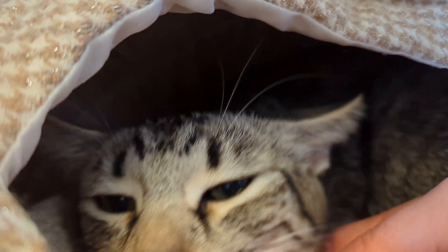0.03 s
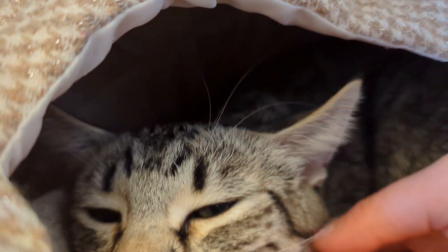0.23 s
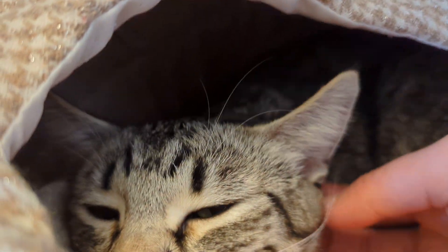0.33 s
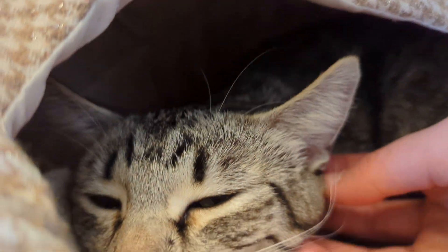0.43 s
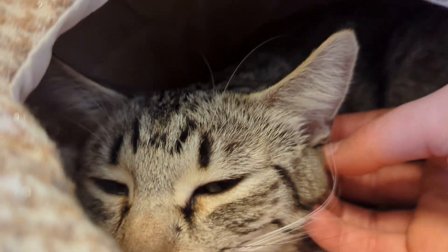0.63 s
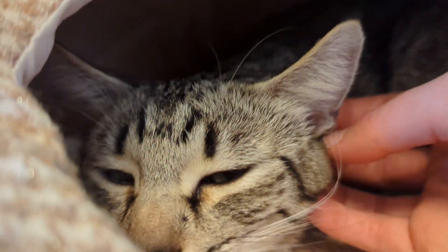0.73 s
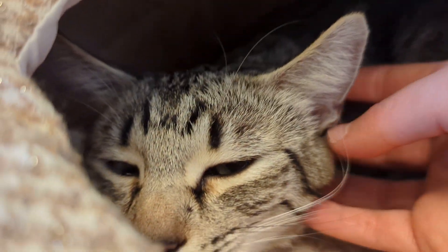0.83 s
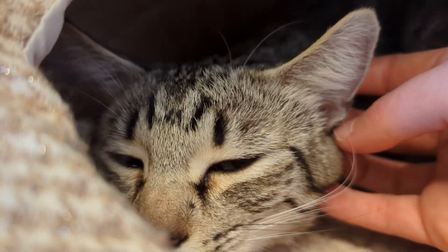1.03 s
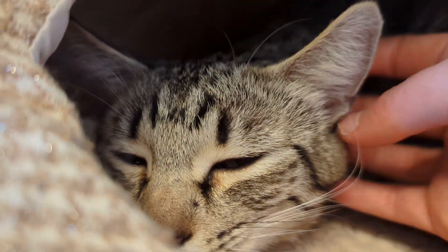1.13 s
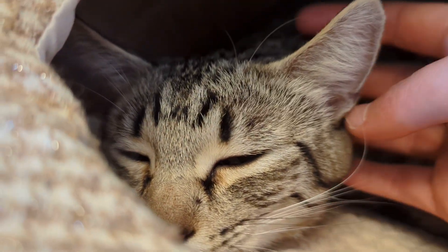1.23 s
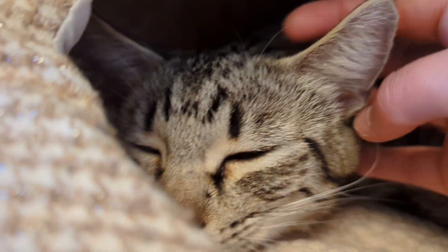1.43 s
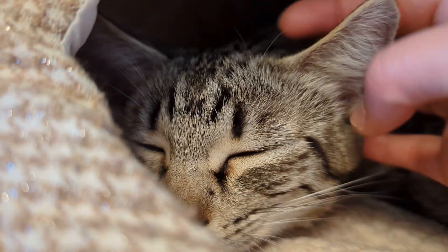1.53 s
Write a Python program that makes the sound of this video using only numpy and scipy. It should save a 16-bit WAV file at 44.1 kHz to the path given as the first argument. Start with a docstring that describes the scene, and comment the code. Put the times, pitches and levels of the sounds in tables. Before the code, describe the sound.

Fingers scratch a cat under a blanket, close to the microphone. A faint purr and brief hollow tone open over low room rumble. From 0.3 to 0.9 seconds, strokes rub fabric and swish through fur with a thin ring. Soft, deep thumps bump the microphone, strongest near 0.5. One short scuffing knock comes at about 1.05, then light blanket grazes and quicker purring until 1.6.

```python
"""A faint purr and a brief hollow tone over the low rumble of a quiet room; then, close up, fingers
scratch a cat that lies under a blanket. Each stroke drags over fabric (a dull rub with a thin ring)
and through fur (a bright swish); hand or blanket bumps the microphone with soft, deep thumps.
The purr is a train of pulses ringing throat and chest. About a second in, one short scuffing
knock sounds into the room."""
import sys
import numpy as np
from scipy import signal
from scipy.fft import rfft, irfft
from scipy.io import wavfile

SR = 44100
rng = np.random.default_rng(int(sys.argv[2]) if len(sys.argv) > 2 else 0)


def log_audio(samples):
    """Write samples as a 16-bit WAV file to the path given in sys.argv[1]."""
    # one column per channel
    frames = np.atleast_2d(samples).T
    # limit to full scale, then quantise
    limited = np.clip(frames, -1, 1)
    pcm = np.round(limited * 32767).astype(np.int16)
    wavfile.write(sys.argv[1], SR, pcm)


N = 70560
T = np.arange(N) / SR

# how alike left and right are in the noise beds: freq_hz, correlation
STEREO_LIKENESS = [(60, 1), (150, 0.94), (300, 0.68), (550, 0.058), (1600, -0.2), (5000, -0.019),
                   (15000, 0.088)]
# which way the noise beds lean: freq_hz, left_minus_right_db
STEREO_BALANCE = [(60, -1.9), (300, 1.8), (550, -0.5), (1500, -1.5), (4000, 0), (8000, -1.5), (14000, -5)]
# colour of the room rumble: freq_hz, density_db
ROOM_SPECTRUM = [(20, -37), (32, -29.5), (45, -5.5), (62, 1.5), (76, 2.5), (97, -2.5), (118, -2),
                 (140, -17), (200, -29.5), (280, -20.5), (400, -30), (490, -40), (600, -35), (800, -46.5),
                 (1800, -54), (4200, -67), (15000, -77.5)]
# the rumble's gentle swell: time_s, gain_db
ROOM_SWELL = [(0, 0.5), (.25, 1), (.7, 6.5), (.95, 0.5), (1.25, 0.5), (1.6, 0.5)]
# runs of purring, the last one quicker: start_s, end_s, pulse_rate_hz, gain_db
PURR_RUNS = [(0.018, .15, 24, -6), (.206, .45, 23.6, -1.5), (0.592, 1.05, 23.4, -3), (1.209, 1.6, 29, -3.5)]
# resonances of throat and chest: pitch_hz, level_db, t60_s
THROAT_MODES = [(97, -49, 0.065), (246.4, -52, 0.056), (276.8, -51, 0.098), (359, -57, 0.061),
                (600, -65, 0.056)]
# light grazes of the blanket: start_s, rise_s, hold_s, level_db
BLANKET_BRUSHES = [(0.196, 0.1, 0.029, -79.5), (1.31, .012, .012, -80.5), (1.422, 0.021, 0.047, -71),
                   (1.52, 0.059, .05, -75)]
# colour of a graze: freq_hz, density_db
BRUSH_SPECTRUM = [(200, -17.5), (700, 6.5), (1600, 4.5), (2600, -3), (4500, -14), (7000, -30), (16000, -25)]
# hand or blanket bumping the microphone: start_s, gain_db, tilt_db_per_octave, length_ratio
MIC_BUMPS = [(.205, -13, 1, 0.32), (0.323, -15, 2, 0.77), (.468, 0, 1.5, 1.0), (.875, -17, 1, 0.49),
             (0.946, -18.5, -4.5, 1.22), (1.556, -22, -6.5, 1.3)]
# the deep tones of a thump, swelling one after another: pitch_hz, level_db, delay_s, rise_s, t60_s
THUMP_MODES = [(40.8, -32.5, 0.044, 0.027, .3), (58.7, -22, 0.041, 0.027, .55),
               (100.46, -17.5, 0.0085, 0.024, 0.28), (184, -35.5, -.002, .022, 0.18)]
# colour of the dull crush in each bump: freq_hz, density_db
CRUSH_SPECTRUM = [(60, -27), (150, -1), (250, 1.5), (400, -7), (520, -17), (800, -26.5), (2000, -52.5),
                  (16000, -78.5)]
# finger strokes: start_s, rise_s, hold_s, rub_db, resonance_over_rub_db, swish_db
FINGER_STROKES = [(0.282, 0.034, 0.016, -55, -9.5, -86), (0.311, 0.023, 0.013, -52.5, 2.5, -72),
                  (0.388, 0.0088, 0.025, -49.5, 4.5, -61.5), (0.403, 0.048, 0.018, -62.5, -15, -55.5),
                  (0.529, .004, 0.0036, -69, -6, -54), (.541, 0.011, 0.0082, -58, -4, -51.5),
                  (.585, 0.018, 0.0051, -65.5, -17, -66), (0.653, 0.0052, 0.019, -83, -19, -53.5),
                  (0.68, 0.0087, 0.098, -65.5, -9.5, -73), (0.779, 0.047, 0.0068, -68, -9, -61),
                  (0.807, 0.026, 0.016, -56, -7.5, -78), (0.936, 0.014, 0.0047, -69.5, -16, -80)]
# dull colour of rubbed fabric: freq_hz, density_db
RUB_SPECTRUM = [(150, -2), (350, 0), (640, 6), (820, -6.5), (1130, 3.5), (1350, 0.5), (1750, -1),
                (2300, -1), (3000, -12.5), (4200, -16.5), (9000, -34), (16000, -43)]
# midrange resonances of the rub, also heard in the knock: pitch_hz, width_hz, gain_db
RUB_RESONANCES = [(1587, 26, -11.5), (1606, 36, -10), (1743, 17.2, -1), (1849, 29, -9), (1910, 16, -5.5)]
# bright colour of fur: freq_hz, density_db
FUR_SPECTRUM = [(300, 2), (900, 5.5), (2600, 3), (4000, 0.5), (5600, -0.5), (7200, 1), (8300, 4.5),
                (10000, -2), (13500, -0.5), (16000, -10)]
# the thin ring over the strokes: pitch_hz, width_hz, gain_db
THIN_RING_MODES = [(4717, 33, -4.5), (4729, 29, -3.5), (4724, 240, 3), (4930, 45, -14), (9730, 70, -15),
                   (12538, 35, -14.5)]
# fader ride of the thin ring: time_s, level_db
THIN_RING_RIDE = [(0, -115), (.28, -105), (.31, -76), (.342, -83), (.355, -58.5), (.41, -59), (.435, -52),
                  (.49, -55), (.535, -64.5), (.6, -76), (.84, -75), (.97, -102), (1.6, -115)]
# the knock's quick contacts: start_s, scuff_db, body_db
KNOCK_CONTACTS = [(1.050, -45, -27), (1.058, -37, -4), (1.0653, -64, 0.5), (1.070, -61, -2),
                  (1.0755, -50, -6.5), (1.121, -57, -11)]
# the hollow body that is knocked: pitch_hz, level_db, t60_s
BODY_MODES = [(279, -42, 0.17), (414.5, -38.5, 0.087), (554.3, -44.5, 0.13), (587, -47, 0.2),
              (643, -44, 0.075)]
# colour of the scuff at each contact: freq_hz, density_db
SCUFF_SPECTRUM = [(300, -8.5), (650, 5), (850, -23.5), (1350, -18), (1620, 2), (1850, 2), (2150, -14),
                  (2850, -7), (3400, -17.5), (5000, -19), (6000, -26.5), (9000, -33), (16000, -45)]
# colour of the room's answer to the knock: freq_hz, density_db
TAIL_SPECTRUM = [(200, -33), (400, 9.5), (600, 7), (820, -12), (1300, -8.5), (1680, -2.5), (2150, -9),
                 (2750, -11.5), (3500, -19), (4900, -22), (7000, -36), (16000, -46)]


def from_db(db):
    """Decibels to gain."""
    return 10 ** (np.asarray(db) / 20)


def unit_rms(x):
    """Scale to unit level."""
    return x / np.sqrt(np.mean(x ** 2) + 1e-20)


def pan(db):
    """Gains for a left-minus-right level difference."""
    return from_db([[db / 2], [-db / 2]])


def at_hz(points, hz):
    """Read a table on a log-frequency axis."""
    freqs, values = np.transpose(points)
    return np.interp(np.log(hz + 1), np.log(freqs), values)


def ride(points):
    """A fader move: gain that follows a table of times and decibels."""
    return from_db(np.interp(T, *np.transpose(points)))


def envelope(start, rise, hold, fall_db_per_s):
    """Smooth rise, hold, then a steady fall in dB."""
    attack = np.sin(np.pi / 2 * np.clip((T - start) / rise, 0, 1)) ** 2
    return attack * from_db(-fall_db_per_s * np.maximum(T - start - rise - hold, 0))


def white():
    """Two unrelated white noises."""
    return rng.standard_normal((2, N))


def colour(noise, spectrum):
    """Give two unrelated noises a tone colour, stereo width and balance; unit level."""
    hz = np.arange(N // 2 + 1) * SR / N
    mid, side = rfft(noise) * from_db(at_hz(spectrum, hz))
    alike = at_hz(STEREO_LIKENESS, hz)
    sides = np.array([[1], [-1]])
    stereo = np.sqrt(1 + alike) * mid + np.sqrt(1 - alike) * side * sides
    balance = from_db(sides * at_hz(STEREO_BALANCE, hz) / 2)
    return unit_rms(irfft(stereo * balance, N))


def resonate(noise, modes):
    """Noise sings through parallel resonances; unit level."""
    out = 0
    for hz, width, db in modes:
        radius = np.exp(-2 * np.pi * width / SR)
        band = [1, 0, -1, 1, -2 * radius * np.cos(2 * np.pi * hz / SR), radius * radius]
        out += from_db(db) * unit_rms(signal.sosfilt([band, band], noise))
    return unit_rms(out)


def ring(clicks, hz, t60):
    """A unit click sets a sine of height 1 ringing."""
    radius = np.exp(-np.log(1000) / (t60 * SR))
    angle = 2 * np.pi * hz / SR
    feedback = [1, -2 * radius * np.cos(angle), radius * radius]
    return signal.lfilter([0, np.sin(angle)], feedback, clicks + 1e-18)


def room_rumble(level_db=-43):
    """A bed of low rumble with a trace of hiss."""
    return from_db(level_db) * ride(ROOM_SWELL) * colour(white(), ROOM_SPECTRUM)


def purr(uneven_db=3.5, lowpass_hz=540):
    """Runs of soft, uneven pulses ring the cat's throat and chest."""
    pulses = [(start + k / rate, db) for start, end, rate, db in PURR_RUNS
              for k in range(int((end - start) * rate) + 1)]
    pulse_s, pulse_db = np.transpose(pulses)
    throat = 0
    for hz, mode_db, t60 in THROAT_MODES:
        clicks = np.zeros(N)
        clicks[(pulse_s * SR).astype(int)] = from_db(pulse_db + mode_db)
        throat += ring(clicks * from_db(uneven_db * rng.standard_normal(N)), hz, t60)
    soften = signal.butter(3, lowpass_hz, fs=SR, output="sos")
    return signal.sosfilt(soften, throat) * pan(-1.6)


def hollow_tone(pitch_hz=600, level_db=-61.5):
    """A faint hollow tone swells and dies away."""
    swell = envelope(start=0.022, rise=0.017, hold=0, fall_db_per_s=109)
    return from_db(level_db) * swell * np.sin(2 * np.pi * pitch_hz * T)


def friction(slips_per_s=5400, spread_db=3.5, slip_share=0.53):
    """Thousands of tiny slips of hairs and fibres over a smooth hiss."""
    sizes = from_db(spread_db * np.minimum(rng.exponential(1, (2, N)), 4)) * np.sign(white())
    slips = unit_rms(sizes * (rng.random((2, N)) < slips_per_s / SR))
    return np.sqrt(slip_share) * slips + np.sqrt(1 - slip_share) * white()


def blanket_brushes():
    """The hand grazes the blanket in light breaths of friction."""
    level = sum(from_db(db) * envelope(start, rise, hold, fall_db_per_s=177)
                for start, rise, hold, db in BLANKET_BRUSHES)
    return level * colour(friction(), BRUSH_SPECTRUM)


def mic_bumps(crush_db=-43.5):
    """Hand or blanket bumps the microphone: soft, deep thumps, each with a dull crush of noise."""
    pivot_hz = THUMP_MODES[2][0]
    thump = crush = 0
    for start, db, tilt, length in MIC_BUMPS:
        push = envelope(start, rise=0.011, hold=0.061 * length, fall_db_per_s=170.5)
        crush += from_db(db + crush_db) * push
        for hz, mode_db, delay, rise, t60 in THUMP_MODES:
            gain = from_db(db + mode_db + tilt * np.log2(hz / pivot_hz))
            swell = envelope(start + delay * length, rise, hold=0, fall_db_per_s=60 / (t60 * length))
            thump += gain * swell * np.sin(2 * np.pi * hz * (T - start))
    return thump * pan(-1.3) + crush * colour(friction(), CRUSH_SPECTRUM)


def finger_strokes():
    """Each stroke rubs the fabric and swishes through the fur; a thin ring rides on top."""
    rub_power = resonance_power = swish_power = 0
    for start, rise, hold, rub_db, resonance_db, swish_db in FINGER_STROKES:
        fabric = from_db(rub_db) * envelope(start, rise, hold, fall_db_per_s=265)
        fur = from_db(swish_db) * envelope(start, rise, hold, fall_db_per_s=317)
        rub_power += fabric ** 2
        resonance_power += (fabric * from_db(resonance_db)) ** 2
        swish_power += fur ** 2
    rub = np.sqrt(rub_power) * colour(friction(), RUB_SPECTRUM)
    resonance = np.sqrt(resonance_power) * resonate(friction(), RUB_RESONANCES)
    swish = np.sqrt(swish_power) * colour(friction(), FUR_SPECTRUM)
    thin_ring = ride(THIN_RING_RIDE) * resonate(friction(), THIN_RING_MODES)
    return rub + resonance + swish + thin_ring * pan(-4.5)


def scuffing_knock(tail_db=-42, tail_t60_s=0.35):
    """A quick run of scuffing contacts rings a hollow body, and the room answers."""
    clicks, scuff_level = np.zeros(N), 0
    for start, scuff_db, body_db in KNOCK_CONTACTS:
        clicks[int(start * SR)] = from_db(body_db)
        scuff_level += from_db(scuff_db) * envelope(start, rise=0.00062, hold=0.0046, fall_db_per_s=608)
    body = sum((-1) ** k * from_db(db) * ring(clicks, hz, t60)   # modes alternate in polarity
               for k, (hz, db, t60) in enumerate(BODY_MODES))
    scuff = colour(friction(), SCUFF_SPECTRUM) + from_db(-8) * resonate(friction(), RUB_RESONANCES)
    loudest_scuff_s = KNOCK_CONTACTS[1][0]
    bloom = envelope(loudest_scuff_s, rise=0.024, hold=0, fall_db_per_s=60 / tail_t60_s)
    tail = colour(white(), TAIL_SPECTRUM) + from_db(-18) * resonate(white(), RUB_RESONANCES)
    return body * pan(0.65) + scuff_level * scuff + from_db(tail_db) * bloom * tail


def scene():
    """The close-up hand sounds, mixed with the purr, the knock and the background."""
    hand = finger_strokes() + blanket_brushes() + mic_bumps()
    return hand + purr() + scuffing_knock() + hollow_tone() + room_rumble()


def record(dry, low_cut_hz=36.4, high_cut_hz=15750, fade_s=0.012):
    """Thin the deepest bass, fade both ends and cut the top steeply."""
    low_cut = signal.butter(6, low_cut_hz, "high", fs=SR, output="sos")
    high_cut = signal.ellip(12, 0.1, 80, high_cut_hz, fs=SR, output="sos")
    fade = np.sin(np.pi / 2 * np.clip(np.minimum(T, T[::-1]) / fade_s, 0, 1)) ** 2
    return signal.sosfilt(high_cut, fade * signal.sosfilt(low_cut, dry))


dry = scene()
out = record(dry)
log_audio(out)
```